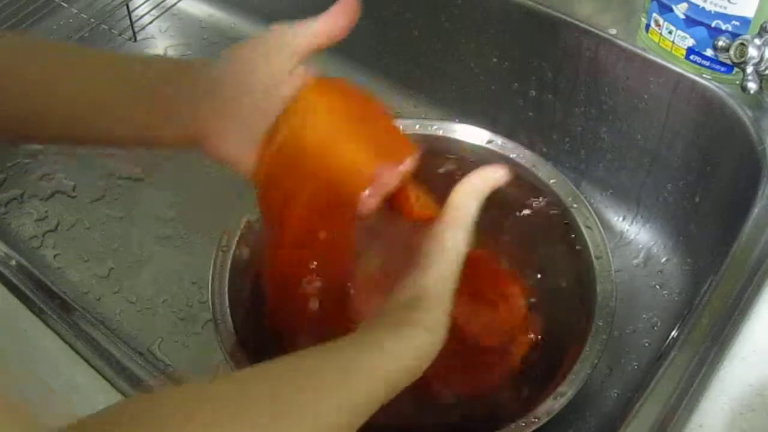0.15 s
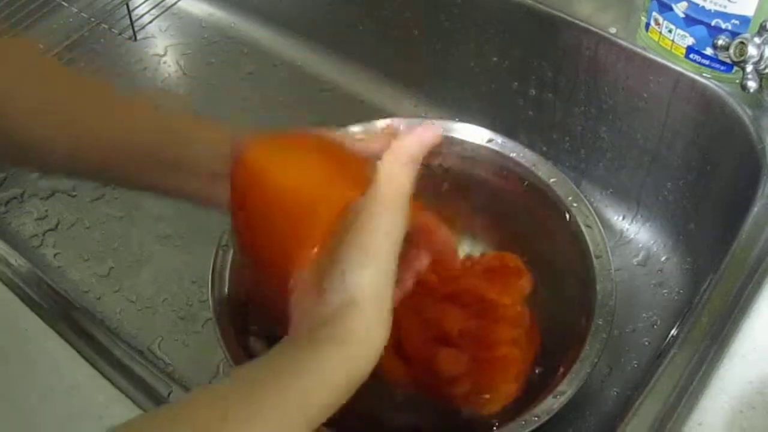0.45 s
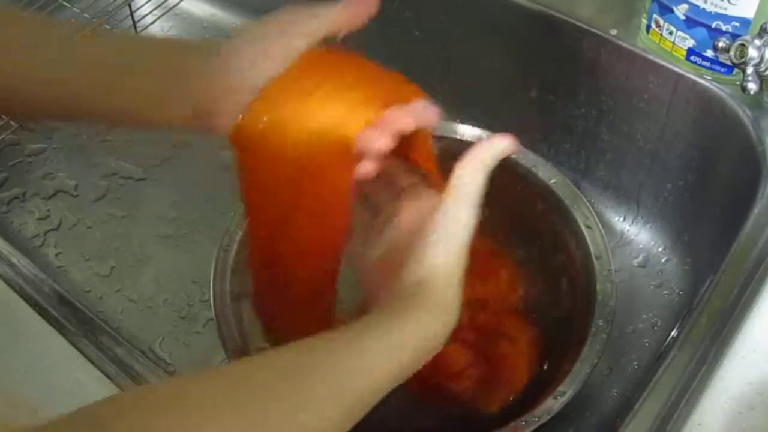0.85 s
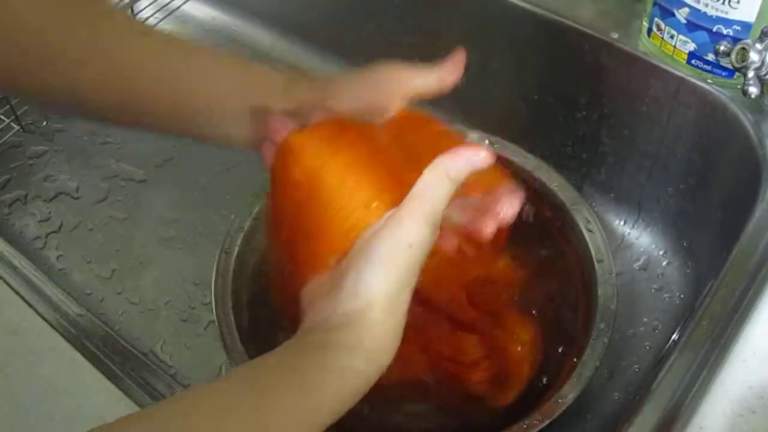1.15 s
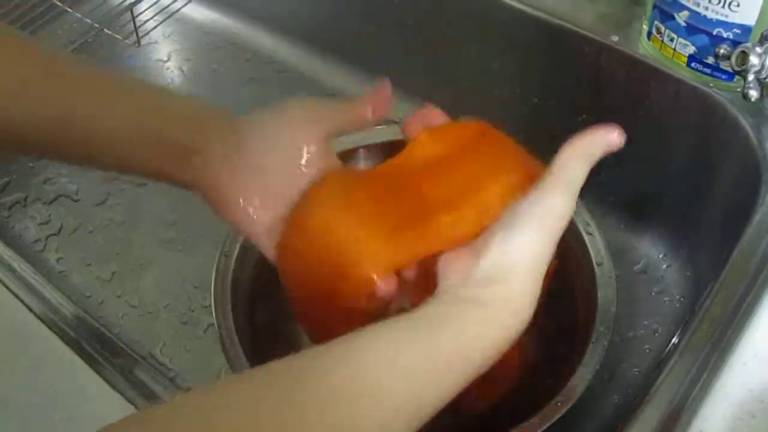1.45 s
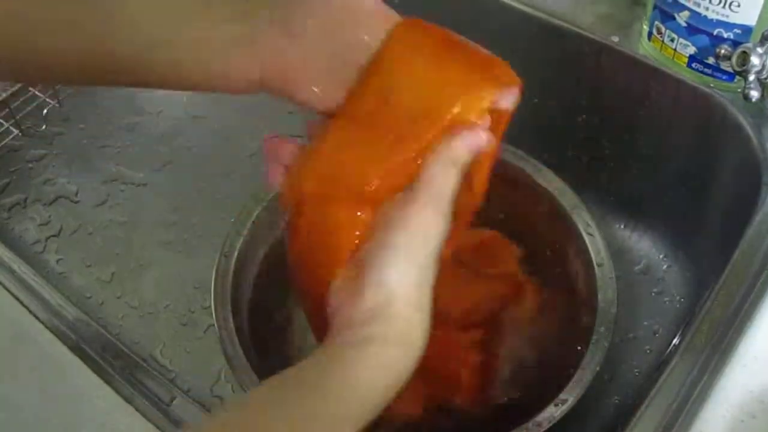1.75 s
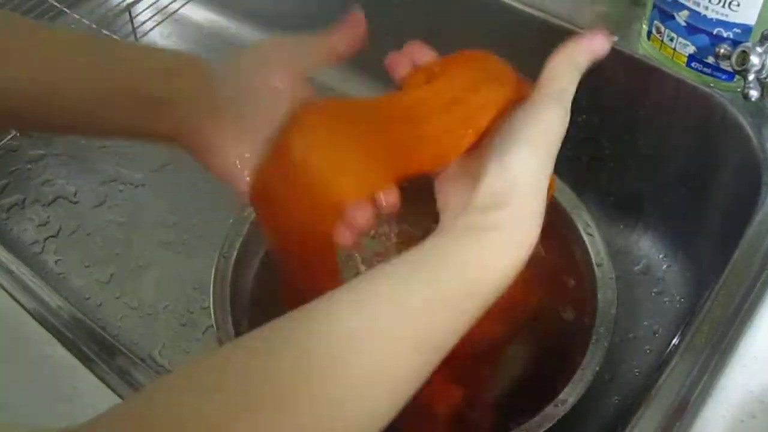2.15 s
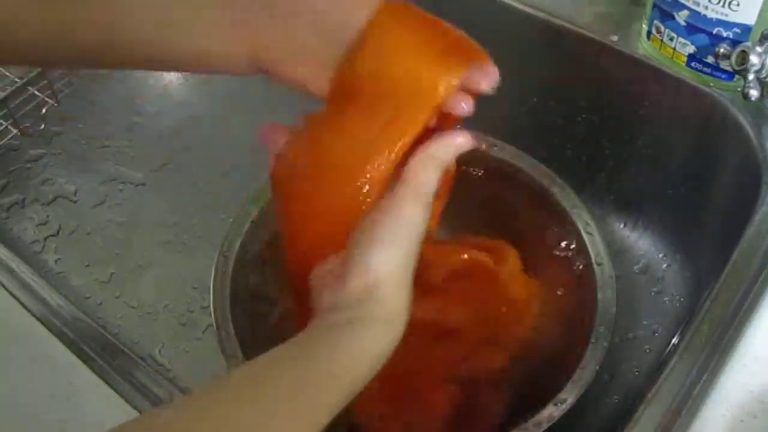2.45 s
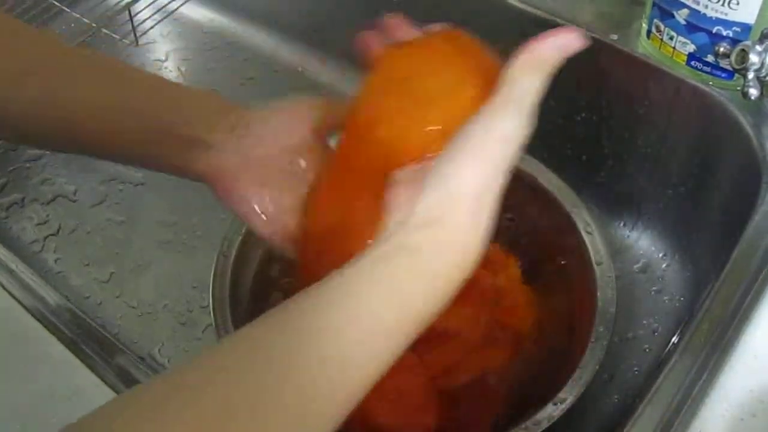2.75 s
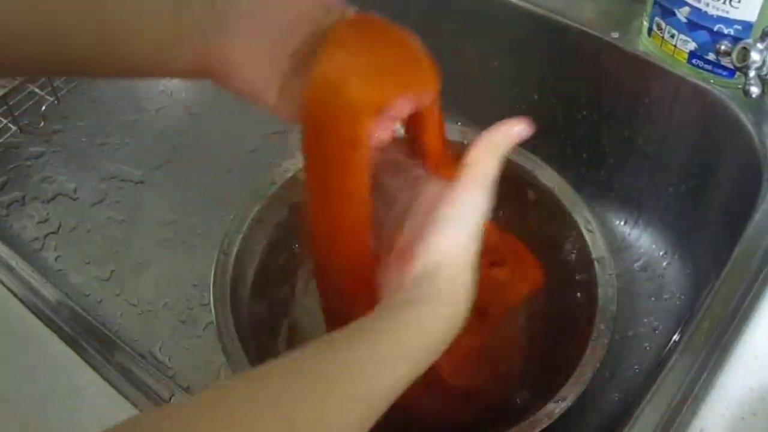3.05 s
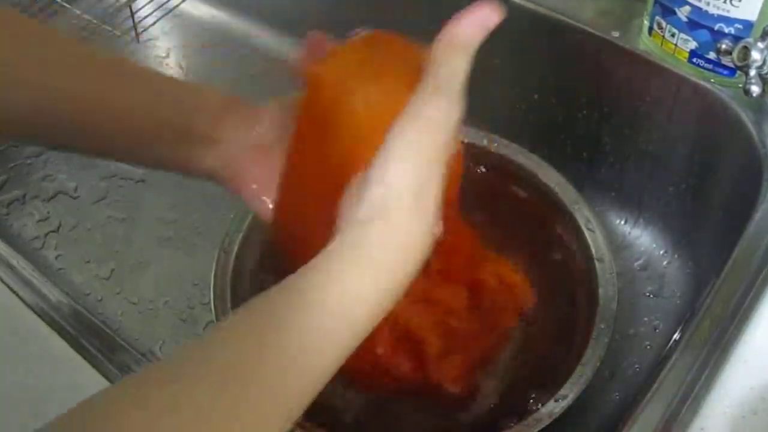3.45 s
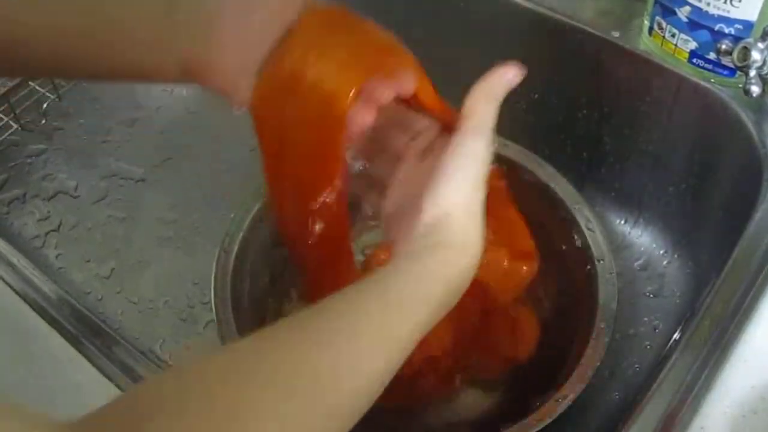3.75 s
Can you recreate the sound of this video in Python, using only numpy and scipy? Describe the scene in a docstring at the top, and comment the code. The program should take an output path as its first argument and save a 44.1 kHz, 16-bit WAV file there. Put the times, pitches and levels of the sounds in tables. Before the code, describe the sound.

Water drips and splashes from a soaked skein turned over a bowl in a steel sink. Quick high plinks and patter come in the first 0.6 seconds, a crisp splash near 0.9, a lull around 1.3-1.6, then denser slaps and loud bubbly plops from 1.7 to 2.7, strongest near 2.0. Sparser drops follow, with a lower plop at 3.1 and a bright one at 3.4. Close, slightly metallic small room; faint low hum.

```python
"""At a steel sink in a small room, a soaked skein is turned hand over hand above a bowl of water.
Drops running off it slap the surface and trap bubbles: sines that ring, fade and climb in pitch.
Slaps are bursts of noise followed by sprays of tiny bubbles; three layers of patter follow the runoff.
Noise-like reflections and ringing steel modes answer the water. Soft booms, steady room air
and a low hum, wavered by a narrow band of noise, lie beneath."""
import sys
import numpy as np
from scipy import signal
from scipy.fft import rfft, irfft
from scipy.io import wavfile

SR = 44100
rng = np.random.default_rng(int(sys.argv[2]) if len(sys.argv) > 2 else 0)


def wav_out(sig):
    """Save sig, one row per channel (or a flat mono array), as 16-bit PCM at SR to the path in sys.argv[1]."""
    wavfile.write(sys.argv[1], SR, np.round(np.clip(np.atleast_2d(sig).T, -1, 1) * 32767).astype(np.int16))


N = 171990  # length in samples


def undb(db):
    """Decibels to gain."""
    return 10 ** (np.asarray(db) / 20)


def unit(x):
    """Scale to rms 1."""
    return x / np.sqrt(np.mean(x ** 2) + 1e-18)


def add(out, start_s, sound):
    """Mix a sound in at a time, cut off at the end of the output."""
    i = int(np.clip(start_s * SR, 0, len(out)))
    out[i:i + len(sound)] += sound[:len(out) - i]


def curve(points):
    """Gain over time, straight in dB between (seconds, dB) points."""
    times, levels_db = np.array(points).T
    return undb(np.interp(np.arange(N) / SR, times, levels_db))


def noise(gain_at):
    """Noise of rms 1, shaped by a gain at each frequency."""
    freqs = np.arange(N // 2 + 1) * SR / N + 1e-9  # just above zero, so a logarithm is safe
    spectrum = rfft(rng.standard_normal(N)) * gain_at(freqs)
    return unit(irfft(spectrum, N))


def ring(hz, cycles):
    """A bubble: a sine that swells, fades and climbs in pitch as it nears the surface."""
    onset_cycles = 0.7
    rise, rise_ref_hz = 0.059, 2740  # share of pitch gained per life; lower bubbles climb less
    life = cycles / hz  # seconds to fade to 1/e
    t = np.arange(int(7 * life * SR) + 2) / SR
    swell = (1 - np.exp(-t * hz / onset_cycles)) ** 2
    climb = rise * np.sqrt(min(hz / rise_ref_hz, 1)) * t / life
    phase = 2 * np.pi * hz * t * (1 + climb / 2)  # half, because pitch is the slope of phase
    return swell * np.exp(-t / life) * np.sin(phase)


def grains(times, gains, length, hz, octaves, cycles, scatter_db):
    """A cloud of tiny bubbles of scattered pitch, strength and ring time."""
    out = np.zeros(length)
    chance = np.clip(rng.standard_normal((len(times), 3)), -2, 2)
    centres = np.broadcast_to(hz, len(times))
    for start, gain, centre, (pitch, strength, damping) in zip(times, gains, centres, chance):
        f = centre * 2 ** (octaves * pitch)
        f = min(f, 14000 ** 2 / f)  # pitches above 14 kHz fold back down
        tilt = (f / centre) ** 0.93  # higher than the centre is louder
        bubble = ring(f, cycles * np.exp(0.3 * damping))
        add(out, start, gain * undb(scatter_db * strength) * tilt * bubble)
    return out


def crack(hz):
    """Water meets water: a burst of broad noise that fades in about a millisecond."""
    fade_s, span = 0.00093, 1.95  # time to 1/e; the band reaches this factor either side of the centre
    t = np.arange(SR // 50) / SR
    edges = [hz / span, min(hz * span, 0.45 * SR)]
    band = signal.butter(1, edges, "band", fs=SR, output="sos")
    burst = signal.sosfilt(band, rng.standard_normal(len(t)) * np.exp(-t / fade_s))
    return burst * np.sqrt(fade_s * SR / 2 / np.sum(burst ** 2))  # same energy at every centre


def bubbles(count=8):
    """Each drop ticks on the water and traps a ringing bubble, with smaller ones torn off around it."""
    # Drops that trap a bubble. Each row: start in seconds, pitch in Hz, level in dB, fade to 1/e in cycles.
    ringing_drops = [(0.086, 7670, -22.5, 7.8), (.174, 9160, -26.5, 14), (0.216, 6260, -30, 8.1),
                     (0.2783, 2900, -20.5, 4.8), (.2805, 3550, -20.5, 4.4), (0.293, 1703, -23.5, 4.4),
                     (0.328, 3000, -27, 7), (0.364, 3030, -39, 7.3), (0.428, 4240, -36.5, 12),
                     (0.435, 1420, -39.5, 5.8), (0.498, 4220, -27.5, 13), (0.509, 5080, -27, 7.2),
                     (0.521, 6800, -30, 11), (0.53, 3440, -21.5, 9.6), (.553, 1350, -28.5, 2.2),
                     (0.554, 2595, -22.5, 12), (0.557, 2080, -28, 5.1), (0.573, 3160, -27, 10),
                     (.757, 1430, -36.5, 6.6), (0.781, 3370, -27, 11), (0.834, 4913, -31, 12),
                     (0.9384, 3110, -23.5, 5.9), (0.941, 4030, -20.5, 6.5), (.967, 2860, -20.5, 2.6),
                     (0.978, 2640, -34, 15), (1.0125, 1714, -22, 5), (1.017, 1425, -26, 15.7),
                     (1.139, 3750, -27, 16), (1.186, 4700, -31, 23.4), (1.205, 3882, -29, 11.4),
                     (1.222, 1990, -39, 9.2), (1.253, 1260, -33.5, 4), (1.256, 2354, -40, 37),
                     (1.274, 1216, -35.5, 8.4), (1.396, 2610, -33, 9.4), (1.627, 1792, -36.5, 18),
                     (1.658, 4420, -36, 26), (1.664, 2190, -33, 8.4), (1.679, 1280, -20, 8.9),
                     (1.680, 2030, -21, 6.3), (1.68, 5640, -18, 16), (1.697, 1650, -29.5, 3.3),
                     (1.702, 2530, -28, 10), (1.724, 1282, -33, 9.7), (1.734, 4180, -14.5, 6.5),
                     (1.789, 9400, -37, 16), (1.847, 7230, -26, 14.5), (1.936, 4810, -17.5, 4.9),
                     (1.966, 1078, -29.5, 5.9), (1.983, 953, -32.5, 7), (2.0127, 3340, -9.5, 4.4),
                     (2.039, 2850, -23, 12), (2.055, 3130, -21, 6.2), (2.0588, 3116, -18.5, 13),
                     (2.07, 3800, -17, 4.5), (2.072, 2655, -23.5, 9.7), (2.153, 2800, -39.5, 17),
                     (2.214, 5560, -28.5, 4.8), (2.246, 2110, -34.5, 8), (2.258, 1690, -31, 9.2),
                     (2.263, 1376, -32, 4.54), (2.355, 7000, -20, 5.9), (2.457, 1850, -32, 9.5),
                     (2.413, 4550, -28, 7.4), (2.451, 6805, -18.5, 13), (2.496, 5340, -28, 42),
                     (2.5588, 2480, -21, 6), (2.620, 4520, -28.5, 7), (2.641, 2550, -22.5, 9),
                     (2.644, 1890, -32.5, 7.7), (2.658, 4850, -22, 7.5), (2.682, 1245, -27.5, 10.7),
                     (3.041, 540, -40, 8.3), (3.089, 1350, -11.5, 2.65), (3.149, 2640, -26.5, 4.3),
                     (3.34, 3880, -25.5, 6.2), (3.418, 4350, -15.5, 3.8), (3.468, 3480, -37, 10),
                     (3.503, 1701, -41, 10.3), (3.541, 4680, -28, 5.4), (3.561, 3630, -33.5, 12),
                     (3.768, 1540, -40.5, 9.8)]
    tick_db, trap_s = -3, 0.0008  # tick relative to its bubble; the bubble forms this long after it
    satellite_db, satellite_s = -11.5, 0.006  # relative to the bubble; time they are spread over
    satellite_ratio, satellite_octaves, satellite_cycles = 1.197, 0.377, 2.2
    out = np.zeros(N)
    for start, hz, db, cycles in ringing_drops:
        times = (np.arange(count) + rng.random(count)) / count * satellite_s
        satellites = grains(times, np.exp(-times / satellite_s), SR // 10, hz * satellite_ratio,
                            satellite_octaves, satellite_cycles, scatter_db=-7)
        add(out, start + trap_s, undb(db) * ring(hz, cycles))
        add(out, start, undb(db + satellite_db) * satellites)
        add(out, start, undb(db + tick_db) * ring(hz=6500, cycles=0.3))
    return out


def splashes(count=200):
    """Each slap of falling water cracks and throws up a dense spray of bubbles that dies away."""
    # Slaps that break into spray. Each row: start in seconds, level in dB, centre in Hz, fade in seconds.
    slaps = [(.069, -43.5, 9700, 0.037), (.084, -35.5, 9100, 0.0096), (0.199, -37, 9400, 0.0025),
             (0.216, -31.5, 6400, 0.0068), (0.279, -31, 5770, 0.015), (0.494, -41.5, 7360, 0.0059),
             (0.529, -37, 5470, 0.0039), (0.562, -31, 4520, 0.01), (.665, -44.5, 10900, 0.014),
             (0.715, -43.5, 5950, 0.0043), (0.754, -38, 4800, 0.0051), (0.8762, -24, 9530, 0.0079),
             (.876, -32, 3970, 0.012), (0.941, -39, 9400, 0.023), (1.013, -35, 2310, 0.0025),
             (1.138, -33.5, 3950, 0.00844), (1.140, -39.5, 1040, 0.00871), (1.156, -36, 8950, 0.0046),
             (1.251, -38.5, 2030, 0.0091), (1.320, -45, 5550, 0.014), (1.544, -39.5, 4350, 0.01),
             (1.679, -30.5, 2220, 0.018), (1.6813, -33, 6160, 0.0065), (1.900, -21.5, 5790, 0.0023),
             (1.8983, -32.5, 1100, 0.00677), (1.998, -28.5, 6700, 0.009), (2.056, -35, 8400, 0.011),
             (2.239, -30, 3670, 0.0042), (2.239, -42.5, 760, 0.016), (2.253, -45.5, 1910, 0.03),
             (2.254, -30.5, 8400, 0.0032), (2.308, -32, 6700, 0.011), (2.4149, -30.5, 9200, 0.005),
             (2.438, -34.5, 8900, 0.0025), (2.573, -31.5, 7730, 0.0031), (2.680, -33, 3520, 0.0099),
             (2.747, -39, 5200, 0.00603), (2.775, -42.5, 4940, 0.017), (2.934, -46.5, 5900, 0.022),
             (3.022, -40.5, 8950, 0.008), (3.048, -34, 4130, 0.0082), (3.062, -34.5, 10700, 0.0085),
             (3.089, -26.5, 12700, 0.002), (3.123, -35.5, 1850, 0.01), (3.123, -30.5, 7850, 0.0027),
             (3.457, -41.5, 6400, 0.011), (3.533, -38, 5500, 0.0061), (3.77, -36, 5250, 0.0058)]
    slap_db = -1  # opening crack relative to its spray
    least_per_s, gather = 1600, 0.059  # bubbles a second; build-up as a share of the fade
    spray_octaves, spray_cycles, spray_scatter_db = 0.53, 2, 7
    ref_hz, narrowing = 4170, 0.21  # higher sprays have a narrower spread of pitch
    out = np.zeros(N)
    for start, db, hz, fade in slaps:
        spacing = min(1 / least_per_s, 6 * fade / count)  # short sprays are denser
        times = (np.arange(count) + rng.random(count)) * spacing
        octaves = spray_octaves * (ref_hz / hz) ** narrowing
        strength = np.exp(-times / fade) * (1 - np.exp(-times / (gather * fade)))
        spray = grains(times, strength, SR // 5, hz, octaves, spray_cycles, spray_scatter_db)
        spray *= np.sqrt(fade * SR / 2 / np.sum(spray ** 2))  # energy follows the fade time
        add(out, start, undb(db + slap_db) * crack(hz))
        add(out, start, undb(db) * spray)
    return out


def ticks():
    """Short sharp cracks of noise, some alone, some at the start of a slap or bubble."""
    # Sharp cracks. Each row: start in seconds, level in dB, centre in Hz.
    sharp_cracks = [(.120, -34.5, 10000), (.272, -32, 7500), (.956, -36, 9000), (1.675, -26.5, 6500),
                    (1.7015, -25, 3000), (1.845, -38, 10000), (1.9005, -19.5, 5300), (2.018, -26, 3900),
                    (2.355, -36, 6500), (2.558, -30.5, 7000), (2.64, -35, 3380), (3.0896, -28.5, 2560),
                    (3.128, -26, 4600)]
    out = np.zeros(N)
    for start, db, hz in sharp_cracks:
        add(out, start, undb(db) * crack(hz))
    return out


def patter(rate, hz, octaves, cycles, scatter_db, size=3):
    """Random small drops, each a clump of bubbles of like size, as strong as the flow off the skein."""
    # Water running off the skein. Each row: time in seconds, level in dB before each layer's own level.
    flow = [(0, -57), (.1, -62), (.28, -45), (.45, -59.5), (.58, -44), (.68, -60.5), (.8, -52), (.96, -51),
            (1.08, -51.5), (1.22, -47), (1.48, -57), (1.7, -41.5), (1.86, -53), (2.03, -39), (2.18, -56.5),
            (2.3, -43.5), (2.53, -51), (2.7, -45), (2.88, -60), (3.12, -45), (3.26, -63.5), (3.5, -51.5),
            (3.68, -63), (3.9, -49.5)]
    clump_s, clump_octaves = 0.008, 0.221
    count = int(rate * N / SR)
    chance = np.clip(rng.standard_normal((count, 2)), -2, 2)
    pitch, strength = np.repeat(chance, size, axis=0).T  # shared by a whole clump
    landings = np.repeat(rng.random(count) * N / SR, size)
    times = landings + clump_s * rng.random(count * size)
    centres = hz * 2 ** (octaves * pitch)
    drops = grains(times, undb(scatter_db * strength), N, centres, clump_octaves, cycles, scatter_db=3)
    return curve(flow) * unit(drops)


def runoff():
    """Mid-pitched droplets, a high crackle and low gurgles, all following the same flow."""
    droplets = patter(rate=130, hz=4207, octaves=0.52, cycles=6.4, scatter_db=4.5)
    crackle = patter(rate=260, hz=8430, octaves=0.47, cycles=6.9, scatter_db=2)
    gurgles = patter(rate=110, hz=1725, octaves=0.529, cycles=7.2, scatter_db=0.5)
    return undb(-4) * droplets + undb(-4) * crackle + undb(-12.5) * gurgles


def booms():
    """The sink booms softly under the shifting load: deep sines that swell and die away."""
    # Soft booms of the sink. Each row: start in seconds, peak level in dB.
    swells = [(.22, -52), (1.889, -53), (2.269, -46)]
    boom_hz, swell_s = 94.2, 0.06  # pitch; time to the peak
    out, t = np.zeros(N), np.arange(SR // 2) / SR
    swell = (t / swell_s * np.exp(1 - t / swell_s)) ** 2
    for start, db in swells:
        add(out, start, undb(db) * swell * np.sin(2 * np.pi * boom_hz * t))
    return out


def sink_and_room(x):
    """Quick reflections off the sink walls, the ring of its steel, and the room's tail."""
    # Steel basin modes. Each row: pitch in Hz, time to fall 60 dB in seconds, relative level in dB.
    modes = [(1330, 0.47, -29), (1490, 0.25, -28), (2125, 0.1, -37), (2427, 0.5, -41), (2630, 0.042, -26)]
    wall_db, wall_t60_s, wall_gap_s = -4.5, 0.045, 0.001737
    room_db, room_t60_s, room_treble_t60_s, room_gap_s = -8.5, 0.37, 0.2, 0.011
    steel_db = -4
    t = np.arange(int(SR * 0.6)) / SR

    def fade(t60):
        """Decay that falls 60 dB in t60 seconds."""
        return np.exp(-np.log(1000) * t / t60)

    def energy(h):
        """Scale to an energy of 1."""
        return h / np.sqrt(np.sum(h ** 2))

    near, far = rng.standard_normal((2, len(t)))
    low = signal.sosfilt(signal.butter(1, 4000, fs=SR, output="sos"), far)
    treble = 0.92 * (far - low)
    walls = energy(near * fade(wall_t60_s) * (t > wall_gap_s))
    tail = low * fade(room_t60_s) + treble * fade(room_treble_t60_s)  # treble dies sooner
    room = energy(tail * (t > room_gap_s))
    steel = sum(undb(db) * energy(fade(t60) * np.sin(2 * np.pi * hz * t)) for hz, t60, db in modes)
    response = undb(wall_db) * walls + undb(room_db) * room + undb(steel_db) * steel
    return x + signal.fftconvolve(x, response)[:N]


def room_air():
    """Steady noise of the room's air, weaker towards the treble."""
    # Colour of the air. Each row: frequency in Hz, relative spectral level in dB.
    air_colour = [(20, -2), (50, 2.5), (80, 1), (160, 1), (300, -3), (630, -8), (1300, -8), (3000, -17),
                  (6000, -20), (11000, -25), (16000, -31)]
    hzs, dbs = np.array(air_colour).T
    return undb(-52) * noise(lambda f: undb(np.interp(np.log(f), np.log(hzs), dbs)))


def low_hum():
    """A steady sine plus narrow noise around it, which makes it waver, over fainter noisy lines."""
    # Fainter lines of the hum. Each row: centre in Hz, width at half gain in Hz, level in dB.
    faint_lines = [(97.8, 4.5, -68.5), (369.3, 18, -68.5), (555.4, 5.7, -72.5)]
    # Strongest line over time. Each row: time in seconds, level in dB.
    hum_swell = [(0, -58.5), (.4, -60), (.75, -52), (1.1, -59.5), (1.6, -61.5), (1.85, -53), (2.8, -54),
                 (3.05, -46.5), (3.4, -50.5), (3.7, -46), (3.9, -50.5)]
    hum_hz, waver_gain, waver_hz = 131.9, 0.67, 17  # waver_hz: offset where the noise gain is half
    lines = sum(undb(db) * noise(lambda f: 1 / (1 + ((f - hz) / width * 2) ** 2))
                for hz, width, db in faint_lines)
    waver = noise(lambda f: 1 / (1 + ((f - hum_hz) / waver_hz) ** 2))
    tone = np.sin(2 * np.pi * hum_hz * np.arange(N) / SR)
    return lines + unit(tone + waver_gain * waver) * curve(hum_swell)


def scene():
    """Drops, splashes and patter sound in the sink, over booms, room air and hum."""
    water = bubbles() + splashes() + ticks() + runoff()
    water = signal.sosfilt(signal.butter(2, 313, "high", fs=SR, output="sos"), water)  # thin the lows
    return (sink_and_room(water) + booms() + room_air() + low_hum())[None]


def record(dry):
    """The microphone softens the treble and the recorder cuts the top."""
    mic_hz, top_hz = 14800, 16000
    soft = signal.sosfilt(signal.butter(1, mic_hz, fs=SR, output="sos"), dry)
    return signal.sosfilt(signal.ellip(10, 0.2, 80, top_hz, fs=SR, output="sos"), soft)


dry = scene()
out = record(dry)
wav_out(out)
```